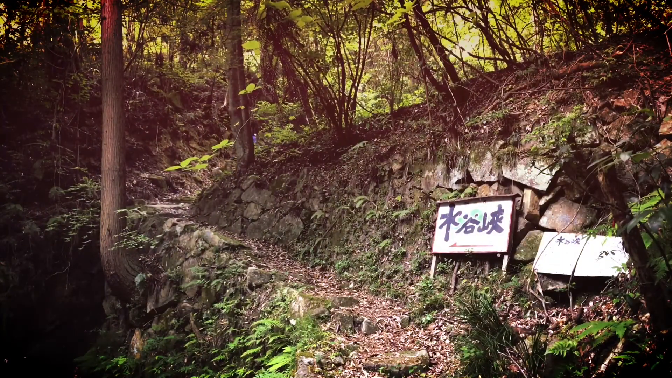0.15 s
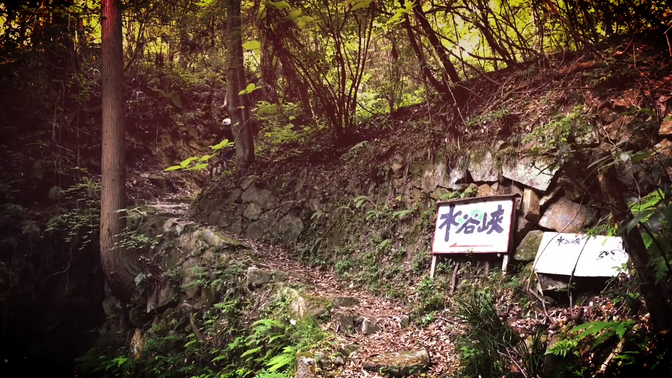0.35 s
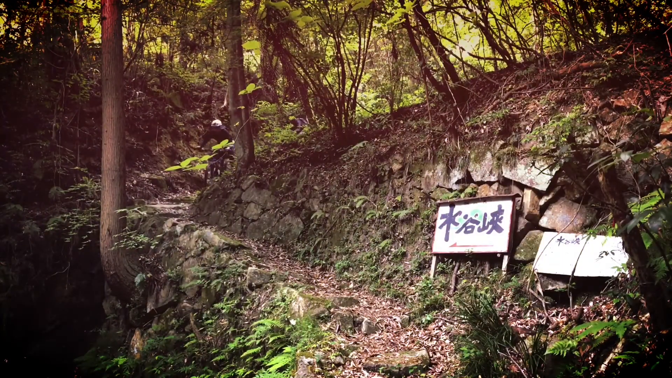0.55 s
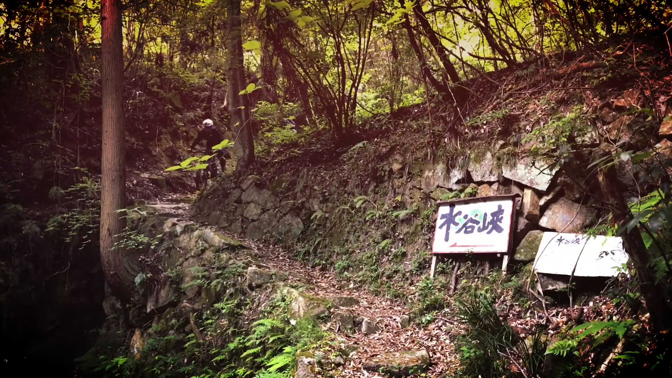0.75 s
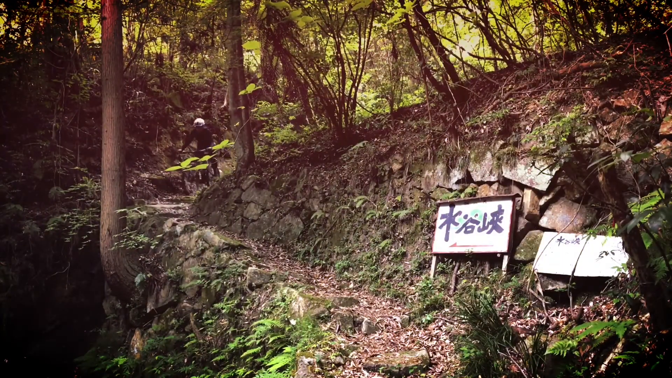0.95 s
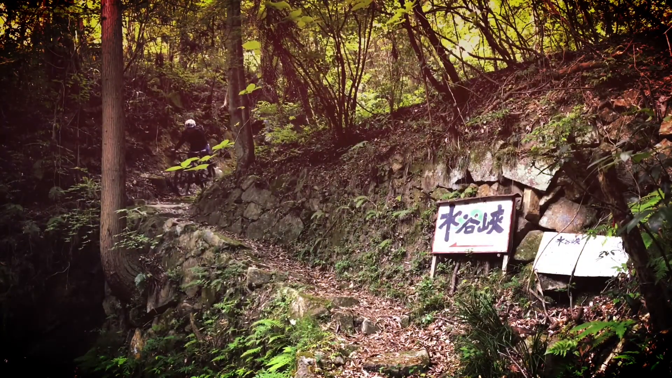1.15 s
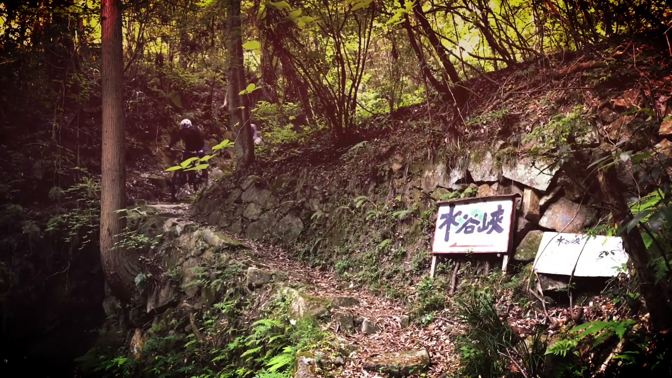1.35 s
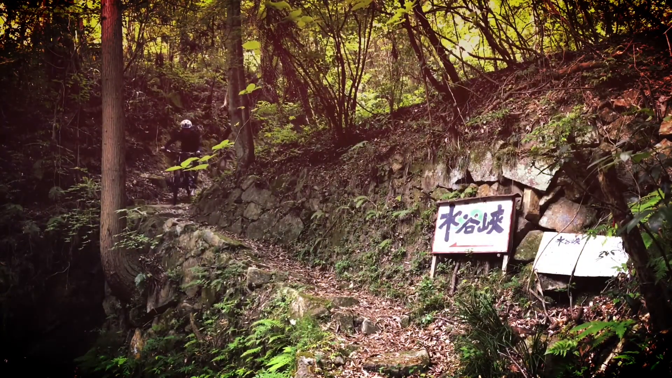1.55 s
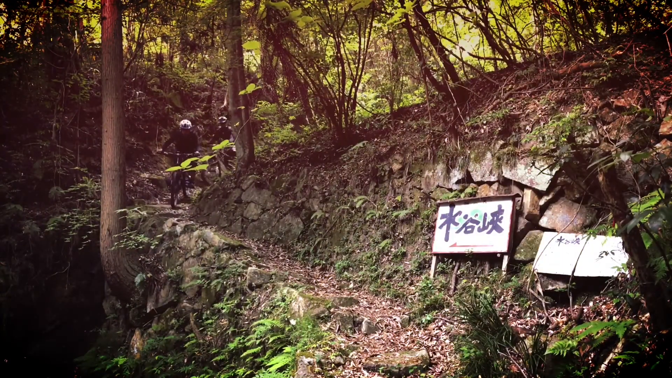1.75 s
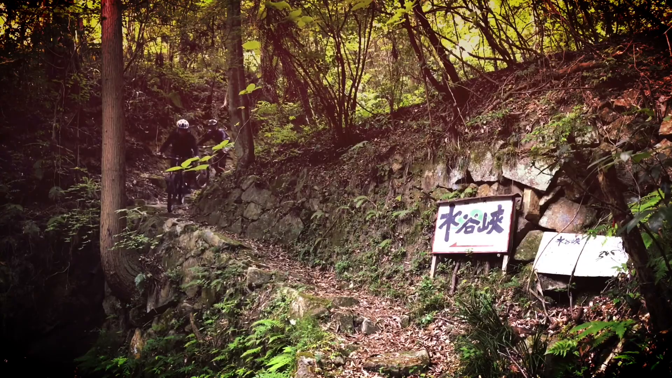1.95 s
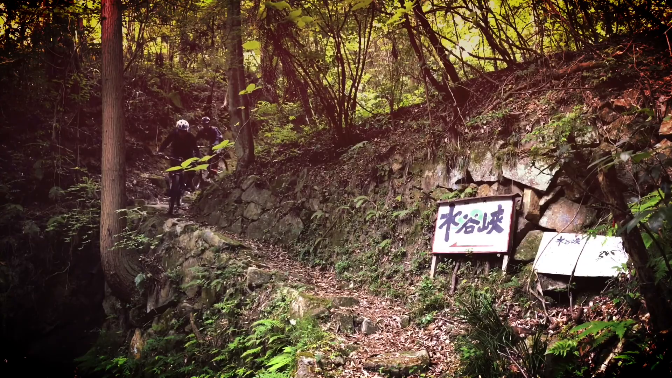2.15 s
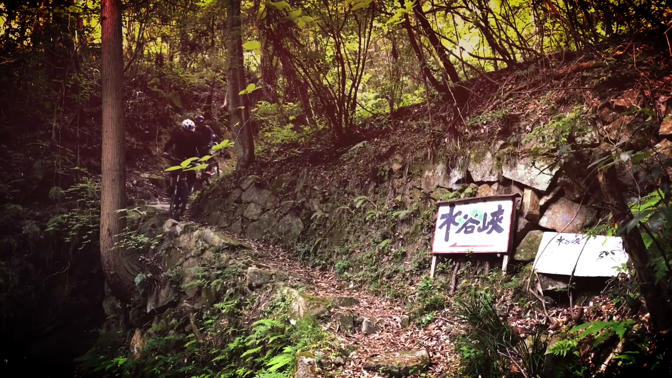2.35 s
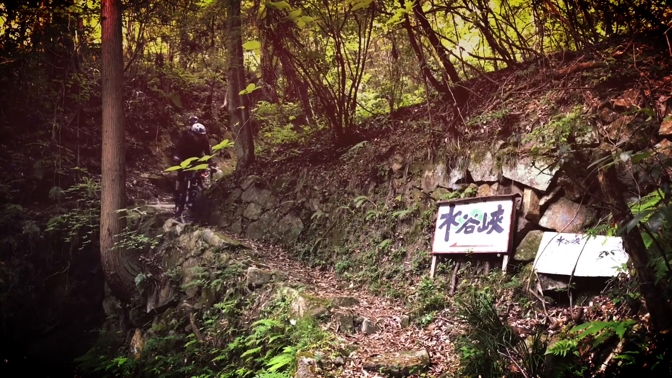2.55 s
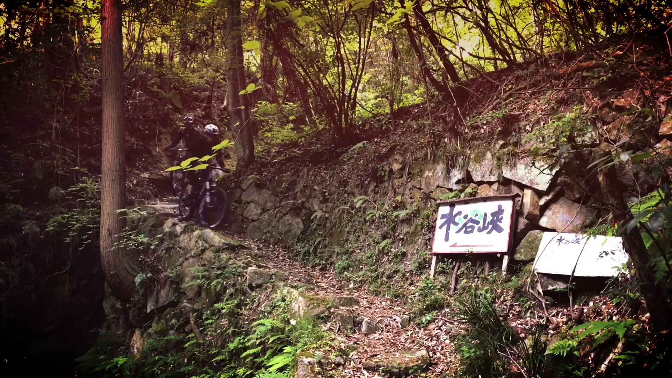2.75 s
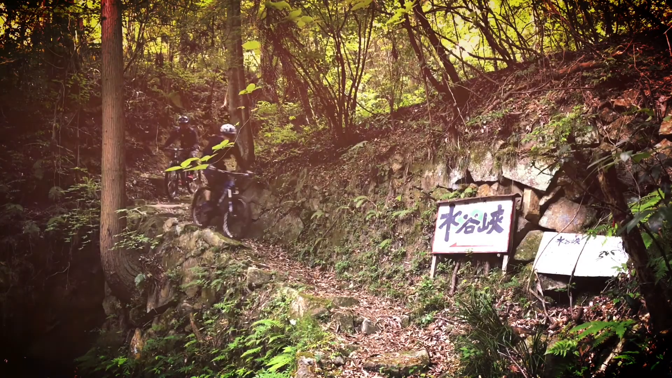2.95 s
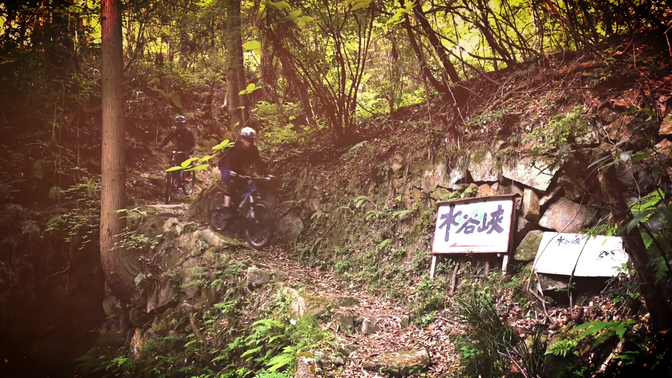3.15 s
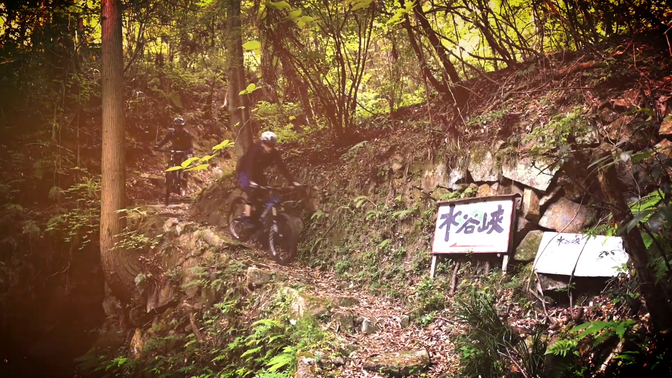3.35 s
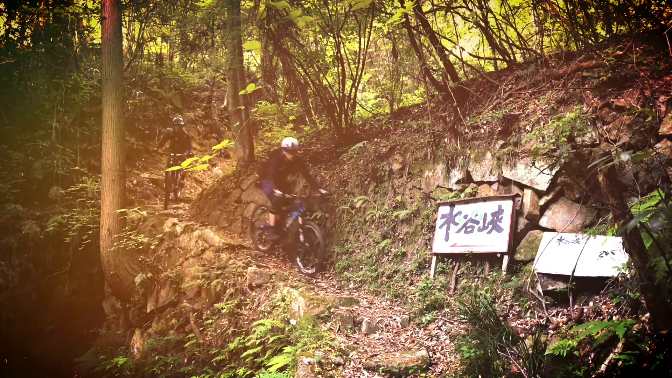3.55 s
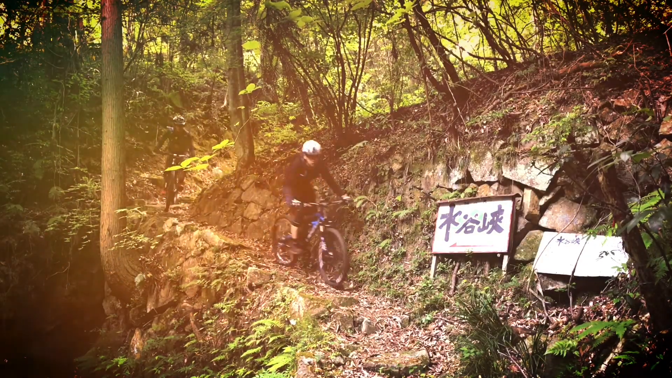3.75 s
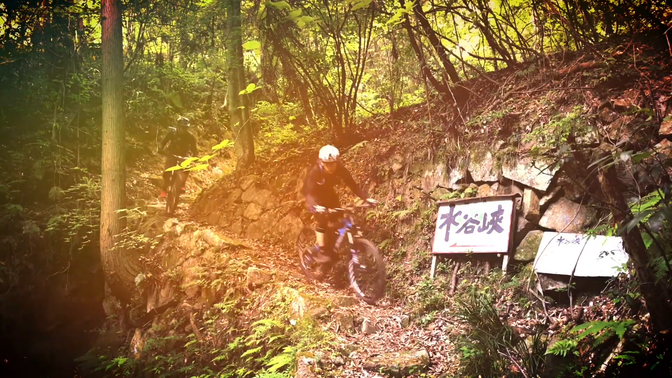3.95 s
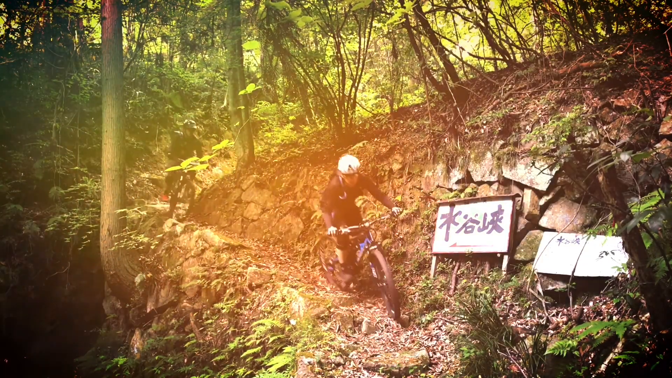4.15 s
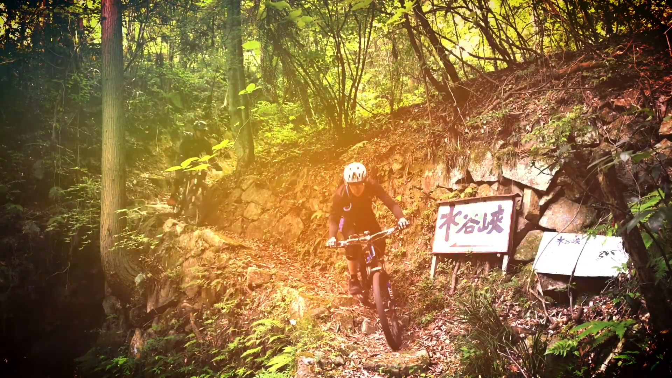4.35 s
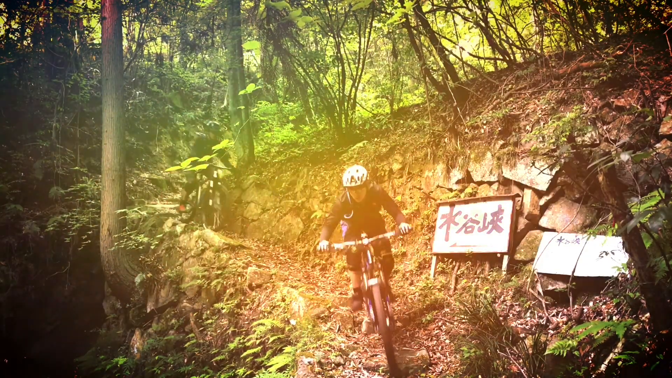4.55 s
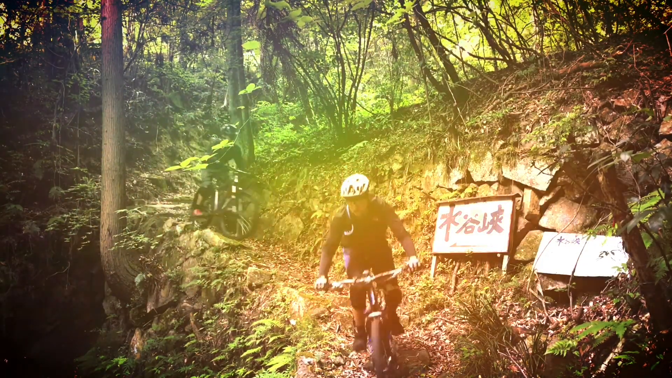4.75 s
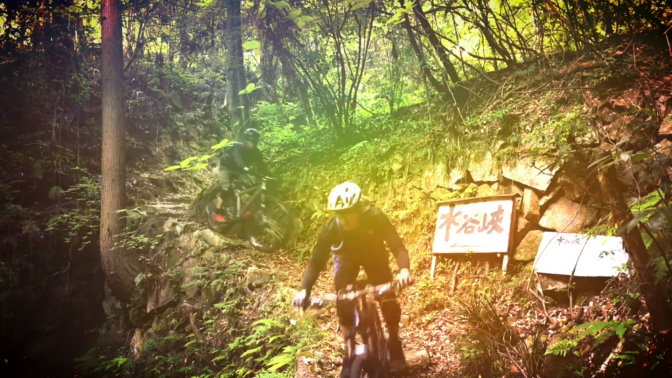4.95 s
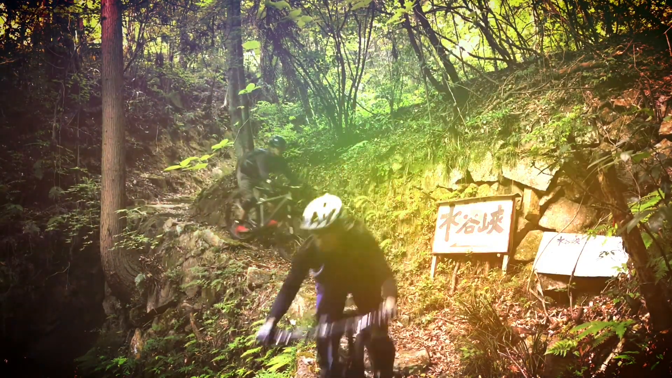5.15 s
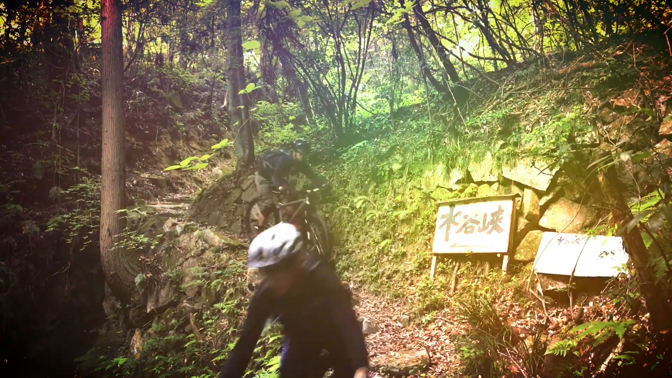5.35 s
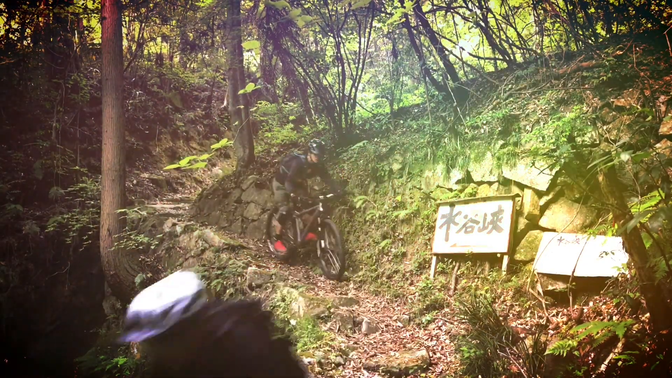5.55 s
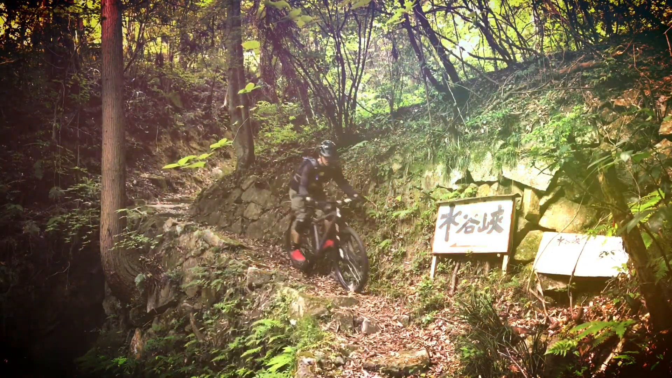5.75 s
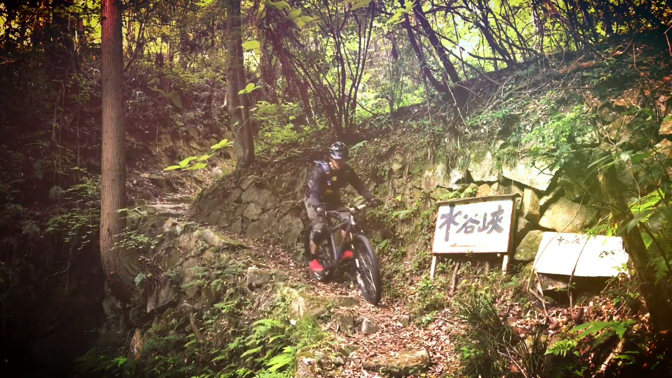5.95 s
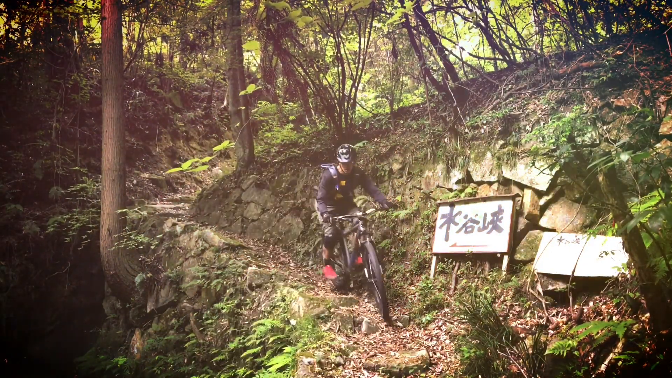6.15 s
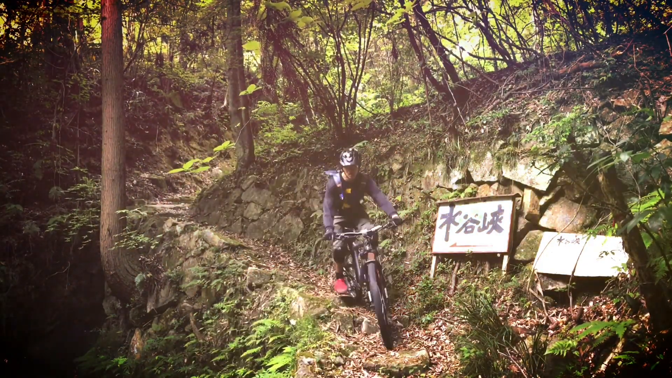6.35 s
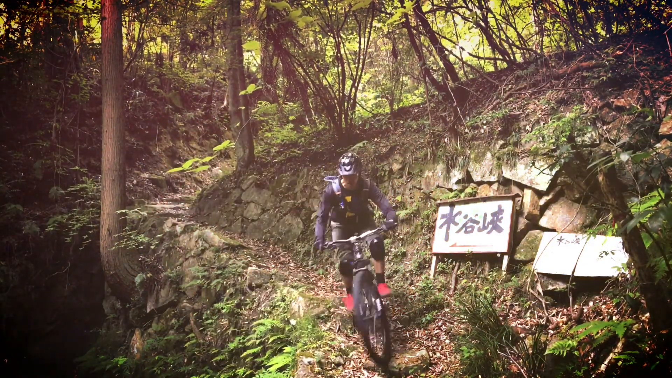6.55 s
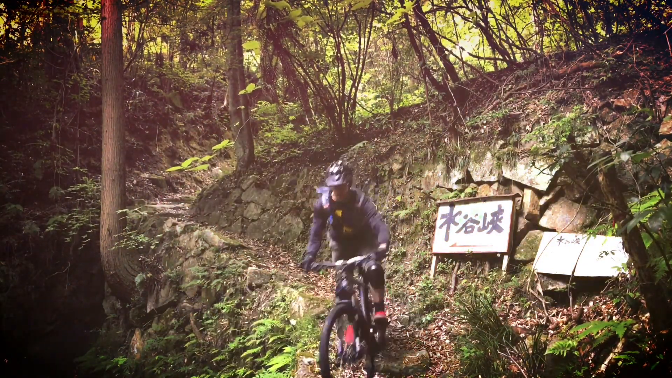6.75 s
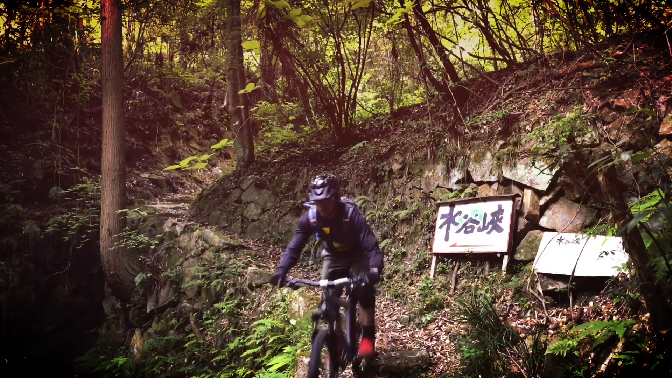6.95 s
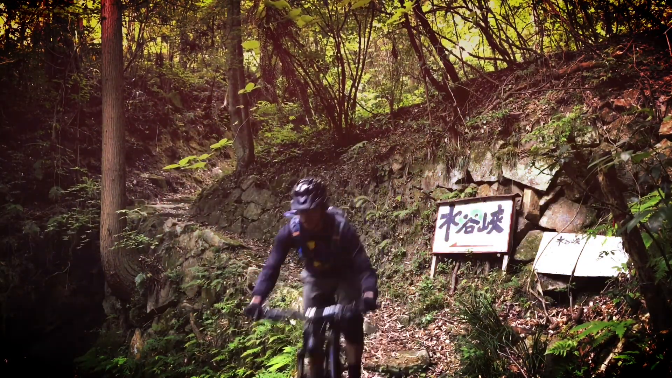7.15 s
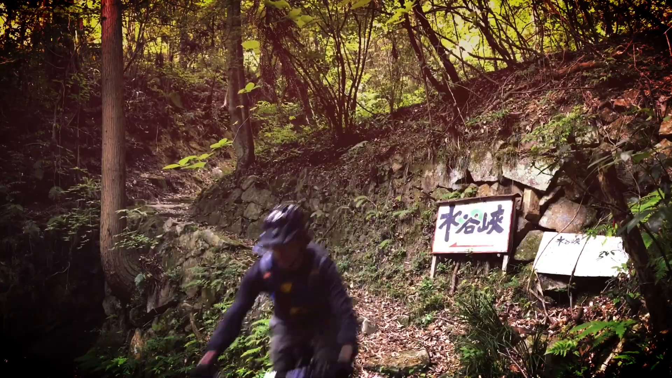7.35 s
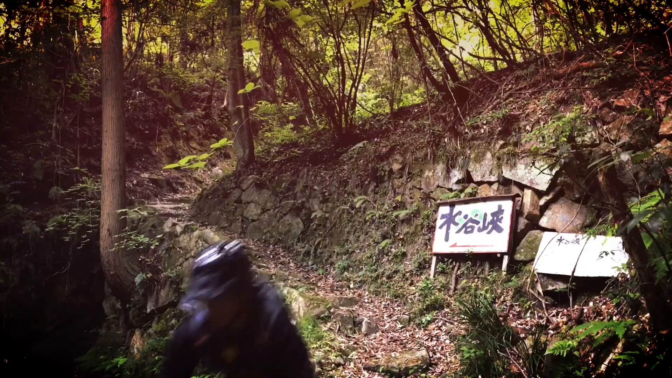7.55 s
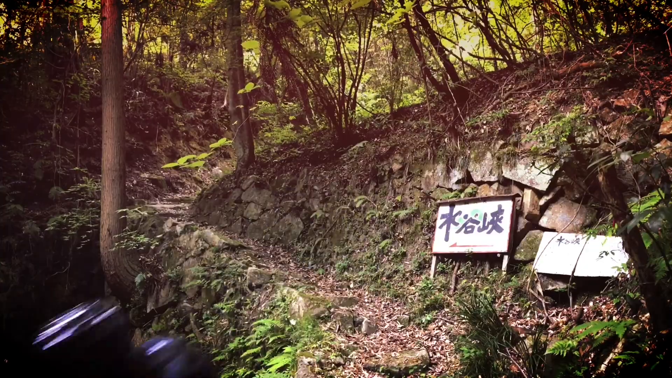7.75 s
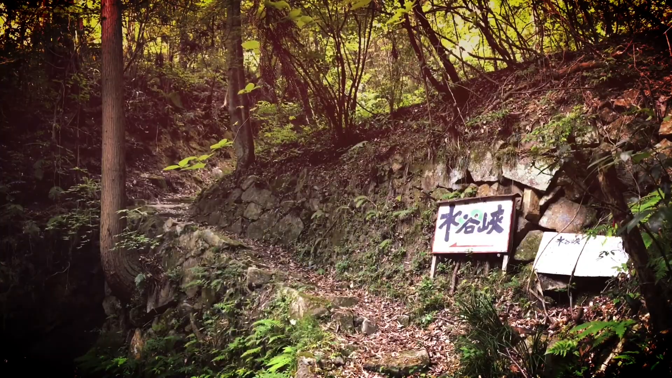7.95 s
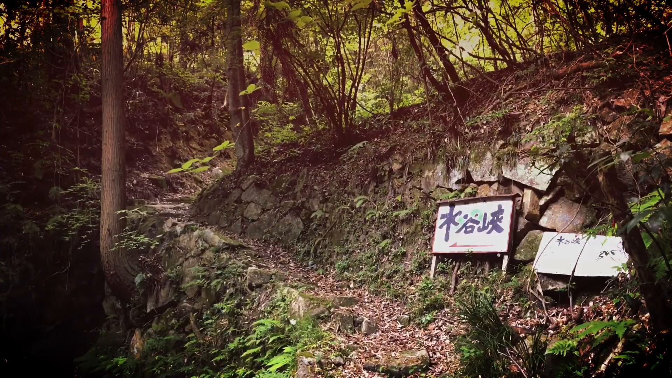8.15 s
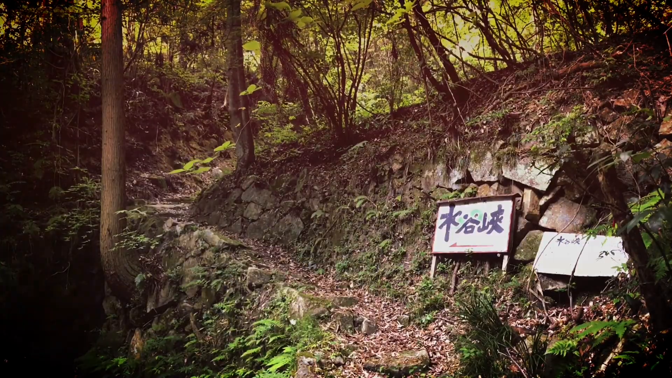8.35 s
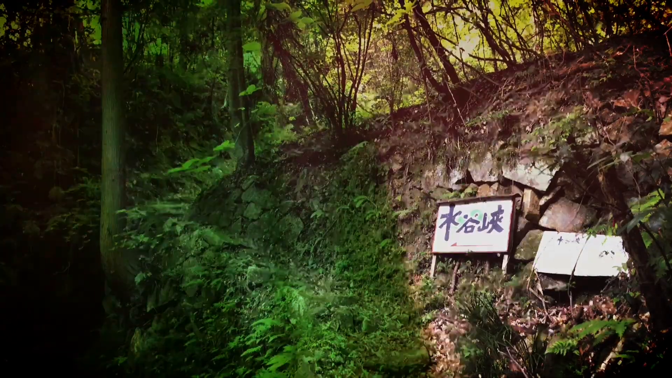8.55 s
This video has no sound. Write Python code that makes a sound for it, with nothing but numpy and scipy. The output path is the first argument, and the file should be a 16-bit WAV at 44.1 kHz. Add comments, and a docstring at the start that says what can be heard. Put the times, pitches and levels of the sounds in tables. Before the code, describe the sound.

A stationary outdoor microphone beside a leafy, stony trail hears two bicycles descend. Sparse pebble knocks and rustling tyres come first, quiet over thin stream hiss. Rubber thumps, tumbling stones and metallic chain rattle crowd together at the loudest close pass, then drop away. A second shorter burst of frame clatter and thumps leads to a sharp, deep landing, some last stone knocks and a softer thud, with slight woodland reverberation.

```python
"""Two mountain bikes come down a rocky forest trail, one after the other, over the faint hiss of a stream.
At first tyres crunch softly and stones knock; past 4 s thumps, scuffs and chain slaps crowd into a loud pass near 6 s.
A smaller flurry follows from 7 s, with a hard landing at 8 s and a softer one as the hiss sinks away.
Leaves, grit and ground are coloured grains; tyres are gliding sines; stones and metal are struck modes.
Frames and chains are clusters of clicks, and the trees scatter a short echo of the bikes."""
import sys
import numpy as np
from scipy import signal
from scipy.fft import rfft, irfft, next_fast_len
from scipy.io import wavfile
from scipy.ndimage import uniform_filter1d

SR = 44100
rng = np.random.default_rng(int(sys.argv[2]) if len(sys.argv) > 2 else 0)


def to_wav(s):
    """Save 16-bit WAV."""
    ch = np.atleast_2d(s).T  # columns
    pcm = np.round(np.clip(ch, -1, 1) * 32767)  # PCM
    wavfile.write(sys.argv[1], SR, pcm.astype(np.int16))


N = 378819
T = np.arange(N) / SR  # s

# a tyre meets a rock or root: start_s, level_db, casing_slap_db (relative to the bounce)
THUMP_HITS = [(0.306, -46.5, 0.5), (1.272, -46.5, 0.5), (1.489, -48, -1), (1.711, -56, 8),
              (1.929, -45.5, 3.5), (2.325, -55, -10), (2.429, -46.5, -2), (2.601, -50.5, 0),
              (2.769, -49, 2), (2.851, -52.5, 7), (2.884, -49, -12), (2.981, -44.5, -19), (3.263, -47, -7),
              (3.721, -49, -3), (4.013, -46, -2), (4.042, -45, 4), (4.345, -49, 7), (4.684, -36, -3),
              (5.002, -35.5, -1.5), (5.212, -34, -16), (5.29, -31, -5), (5.343, -33, 7), (5.511, -29.5, 3),
              (5.647, -29, 3), (5.693, -39.5, 10.5), (5.753, -29, 0), (5.896, -33, 2), (5.96, -29, 8),
              (6.094, -28, 5), (6.737, -39.5, -6), (7.024, -45, 8), (7.244, -48, 5), (7.394, -38, 9),
              (7.529, -31.5, 3.5), (7.694, -42.5, 5), (7.766, -38.5, 1), (7.833, -36.5, 2.5)]
RING_SCATTER_DB = 2  # how unequally each blow excites the modes of stone and metal


def undb(db):
    """Decibels to gain."""
    return 10 ** (np.asarray(db) / 20)


def unit(x):
    """Scale to rms 1."""
    return x / np.sqrt(np.mean(x ** 2))


def fade(t, t60):
    """Exponential decay, 60 dB down after t60 seconds."""
    return np.exp(-np.log(1000) * t / max(t60, 1 / SR))


def add(track, s, sound):
    """Mix a sound into the track at time s."""
    i = max(int(s * SR), 0)
    track[i:i + len(sound)] += sound[:max(N - i, 0)]


def colour(x, points, size=4096):
    """Causal minimum-phase filter through (Hz, dB) points."""
    hz, db = np.transpose(points)
    grid = np.maximum(np.arange(size // 2 + 1) * SR / size, 1)
    level = np.interp(np.log(grid), np.log(hz), db)
    cepstrum = irfft(np.log(undb(level)))
    # fold the cepstrum forward in time, so that nothing sounds ahead of a blow
    cepstrum[1:size // 2] *= 2
    cepstrum[size // 2 + 1:] = 0
    impulse = irfft(np.exp(rfft(cepstrum)))
    return signal.fftconvolve(x, impulse)[:len(x)]


def walk(rate):
    """Smooth random wander with an rms of 1, with rate new values a second."""
    k = int(SR / rate)
    steps = np.repeat(rng.standard_normal(N // k + 1), k)
    return unit(uniform_filter1d(steps, k)[:N])


def grains(count, rate, spread_db):
    """Random tiny impacts over count samples, rate a second, of unequal size and either sign."""
    size = undb(spread_db * np.minimum(rng.exponential(size=count), 2 * np.e))
    hit = rng.random(count) < rate / SR
    return unit(hit * size * rng.choice([-1, 1], count) + 1e-12)


def strength(x, size=176):
    """Scale a blow to a peak near 1, judged over its loudest few milliseconds."""
    return .5 * x / np.sqrt(uniform_filter1d(x ** 2, size).max())


def ring(modes, t, scatter_db):
    """Decaying sine modes (Hz, dB, t60 s); each blow weights them differently."""
    out = 0
    for hz, db, t60 in modes:
        gain = undb(db + scatter_db * rng.standard_normal())
        out = out + gain * fade(t, t60) * np.sin(2 * np.pi * hz * t)
    return out


def bounce(t, hz, t60, stiffening, settle_s, rise_s):
    """A squeezed tyre: stiff and high at first, it sinks to its bounce pitch."""
    phase = 2 * np.pi * hz * (t + stiffening * settle_s * (1 - np.exp(-t / settle_s)))
    swell = (1 - np.exp(-t / rise_s)) ** 2 * fade(t, t60)
    return -np.sin(phase) * swell / swell.max()


def away(start_s=8.18, db_per_s=36.5):
    """Gain of the stream and the steady crush of leaves, which sink in the last moments."""
    return undb(-db_per_s * np.maximum(T - start_s, 0))


def stream(level_db=-58):
    """Distant water: coloured noise that wavers slightly and sinks at the end."""
    # tone of the water: pitch_hz, level_db (per Hz)
    water_tone = [(25, -30), (59, 8), (170, -15.5), (270, -10.5), (500, -17), (900, -8), (1800, -14.5),
                  (4000, -4.5), (6400, -7), (10000, -7), (15500, -10.5)]
    hiss = unit(colour(rng.standard_normal(N), water_tone))
    return hiss * undb(level_db + 0.38 * walk(5.3)) * away()


def forest(x, t60, wet_db):
    """Trunks and the stone bank scatter many small echoes that build within milliseconds and die away."""
    t = T[:SR]
    build = 1 - np.exp(-t / 0.0045)
    echoes = grains(len(t), rate=2000, spread_db=-14.0) * fade(t, t60) * build
    echoes = echoes / np.sqrt(np.sum(echoes ** 2))
    echoes = colour(echoes, [(80, 1.9), (300, -0.013), (1000, 2.0), (15000, 2.1)])
    return x + undb(wet_db) * signal.fftconvolve(x, echoes)[:N]


def crunch(power, spectrum, texture):
    """Give a run of grains its colour and its power over time."""
    return unit(colour(texture, spectrum)) * np.sqrt(power)


def snaps(rate, t60, spread_db):
    """Twigs and pebbles give way at random, each in a tiny burst of noise."""
    sizes = np.abs(grains(N, rate, spread_db))
    envelope = signal.fftconvolve(sizes, fade(T[:SR // 10], t60))[:N]
    return unit(envelope * rng.standard_normal(N))


def flicker(x, rate, depth_db, count=22):
    """Let bands a third of an octave apart swell and fade at random, each on its own."""
    size = next_fast_len(N)
    spectrum, out = rfft(x, size), np.zeros(N)
    hz = np.maximum(np.arange(len(spectrum)) * SR / size, 1)
    # bands count down from the top; the last one takes all the bass below it
    place = np.minimum(3 * np.log2(SR / 2 / hz), count - 1)
    for k in range(count):
        band = irfft(spectrum * np.maximum(1 - np.abs(place - k), 0), size)[:N]
        out += band * undb(depth_db * walk(rate))
    return out


def burst(s, db, length, attack_s, t60):
    """Power over time of a burst that rises, holds and dies away."""
    power, t = np.zeros(N), T[:SR]
    level = undb(db) * np.minimum(t / attack_s, 1) * fade(np.maximum(t - length, 0), t60)
    add(power, s, level ** 2)
    return power


def wheel_work(kick_s=0.0044, kick_t60_s=0.14, kick_grit_db=-11.5, kick_leaves_db=-11):
    """Power in leaves, grit and ground: steady rolling, scuffs, and debris kicked up at every thump."""
    # how loudly the wheels roll: time_s, leaves_db, grit_db, rumble_db
    ride = [(0.0, -65.5, -70, -68), (1.65, -57.5, -65, -66), (2.03, -56, -60, -62), (2.44, -63, -65, -66),
            (3.54, -54.5, -61.5, -62.5), (3.85, -55.5, -65, -57.5), (4.21, -47.5, -55.5, -54),
            (4.47, -53.5, -56.5, -55.5), (5.0, -58.5, -62.5, -57.5), (5.24, -47, -49.5, -48.5),
            (5.5, -44, -54, -45), (5.93, -44, -49, -40.5), (6.1, -40.5, -44.5, -40),
            (6.27, -50.5, -50.5, -48), (7.01, -50, -52, -58), (8.06, -51.5, -53.5, -46.5),
            (8.33, -52.5, -54, -63), (8.59, -52.5, -66.5, -58)]
    # short scuffs and rustles of a tyre in grit or leaves: start_s, length_s, grit_db, leaves_db
    scuffs = [(0.28, 0.1, -59.5, -59), (0.59, 0.11, -74, -60.5), (0.98, 0.054, -57.5, -57.5),
              (1.535, 0.048, -56, -68), (1.963, 0.023, -54, -54), (2.034, 0.032, -52, -73),
              (2.107, 0.087, -53, -53.5), (2.567, 0.13, -79, -57), (2.962, 0.1, -73, -50.5),
              (3.206, 0.059, -57.5, -51.5), (3.578, 0.039, -48, -47.5), (3.614, 0.14, -47.5, -49),
              (3.748, 0.076, -53, -50.5), (3.96, 0.022, -49, -50), (3.984, 0.086, -48, -45),
              (4.08, 0.14, -50, -63), (4.696, 0.077, -46, -46.5), (4.951, 0.093, -50, -48),
              (5.083, 0.036, -42, -49.5), (5.177, 0.027, -43, -47), (5.362, 0.076, -44, -48.5),
              (5.677, 0.019, -41, -36), (5.762, 0.096, -45, -41), (6.075, 0.13, -46, -47.5),
              (6.282, 0.027, -53, -41.5), (6.807, 0.043, -52, -44.5), (7.017, 0.024, -45, -40),
              (7.209, 0.025, -55, -45.5), (8.032, 0.023, -44, -44), (8.261, 0.03, -53, -52)]
    scuff_swell, scuff_fade = 0.23, 3.2  # rise time and t60, as multiples of the scuff's length
    times, *levels = np.transpose(ride)
    leaves, grit, rumble = (undb(np.interp(T, times, db)) ** 2 for db in levels)
    # kick levels are relative to the thump
    kicks = sum(burst(s, db, kick_s, kick_s, kick_t60_s) for s, db, *_ in THUMP_HITS)
    leaves = leaves * away() ** 2 + kicks * undb(kick_leaves_db) ** 2
    grit = grit + kicks * undb(kick_grit_db) ** 2
    for s, length, grit_db, leaves_db in scuffs:
        scuff = burst(s, 0, length, scuff_swell * length, scuff_fade * length)
        grit = grit + scuff * undb(grit_db) ** 2
        leaves = leaves + scuff * undb(leaves_db) ** 2
    return leaves, grit, rumble


def rolling():
    """Tyres crush leaves, grind fine grit, and rumble over the ground: three coloured runs of grains."""
    # tone of each surface: pitch_hz, level_db (per Hz)
    leaf_tone = [(700, -3), (1800, -7), (3200, 3.5), (4400, 3), (6300, -1), (8500, -1), (12000, 1.5),
                 (16000, -7)]
    grit_tone = [(250, -10.5), (480, -5), (720, 2), (1050, 0.5), (1500, -2.5), (2400, -4.5), (3500, -11.5),
                 (7000, -36.5)]
    ground_tone = [(25, -6.5), (45, 6.5), (70, 6), (120, -1.5), (170, -7), (235, 4), (330, -6), (450, -7),
                   (800, -22.5), (2000, -37.5)]
    bumps = walk(45)  # the load on the tyres shakes all three together
    leaves = grains(N, rate=14000, spread_db=3.0) + undb(-5.5) * snaps(rate=87, t60=0.02, spread_db=2.5)
    leaves = flicker(leaves, rate=30, depth_db=2.5)
    grit = grains(N, rate=4500, spread_db=1.0) + undb(-6.0) * snaps(rate=220, t60=0.0076, spread_db=2.0)
    grit = flicker(grit, rate=40, depth_db=2.5)
    earth = flicker(grains(N, rate=700, spread_db=1.0), rate=20, depth_db=2.5)
    in_leaves, in_grit, in_ground = wheel_work()
    return (crunch(in_leaves, leaf_tone, leaves * undb(1.12 * bumps))
            + crunch(in_grit, grit_tone, grit * undb(1.25 * bumps))
            + crunch(in_ground, ground_tone, earth * undb(1.4 * bumps)))


def tumbles(spread_db=2.5, count=64):
    """Loose stones clack together in quick succession, each with its own pitch and strength."""
    # stones tumble behind a wheel: start_s, length_s, level_db (rms over the length), middle_pitch_hz
    runs = [(3.648, 0.082, -47.5, 1260), (4.092, 0.12, -50.5, 1240), (5.374, 0.062, -40.5, 1200),
            (5.785, .06, -40.5, 723), (5.983, 0.056, -43.5, 754), (6.104, 0.067, -44, 690)]
    knocks_per_s, pitch_octaves, ring_cycles = 340, 0.485, 21  # pitch spread; t60 in cycles of the pitch
    out, t = np.zeros(N), T[:SR // 12]
    for s, length, db, middle_hz in runs:
        run = np.zeros(N)
        knocks = np.column_stack([rng.random(count), rng.standard_normal((count, 2))])
        for when, pitch, size in knocks[:max(int(knocks_per_s * length), 1)]:
            hz = middle_hz * 2 ** (pitch_octaves * pitch)
            knock = np.sin(2 * np.pi * hz * t) * fade(t, ring_cycles / hz)
            add(run, s + when * length, undb(spread_db * size) * knock)
        out += undb(db) * run * np.sqrt(length * SR / np.sum(run ** 2))
    return out


def stones(grind_db=-14, tone_db=-3, ring_s=0.049, rubbed_db=-1, rise_s=0.0012):
    """A knocked stone rings with a close pair of modes and grinds to rest; small ones sound brighter."""
    # stones knocked under the wheels: start_s, level_db, pitch_hz, grinding_t60_s
    hits = [(0.31, -48.5, 1480, 0.082), (.795, -52, 950, 0.049), (.961, -39.5, 855, 0.099),
            (1.484, -55, 850, 0.056), (1.708, -49.5, 743, .06), (1.97, -44, 440, 0.075),
            (2.121, -46, 470, 0.1), (2.166, -42.5, 690, 0.051), (2.985, -42, 850, 0.019),
            (3.009, -33.5, 3790, 0.018), (3.066, -40.5, 1050, 0.033), (3.195, -46, 4200, .02),
            (3.25, -40.5, 944, 0.047), (3.541, -43.5, 820, 0.058), (3.595, -39, 980, 0.17),
            (3.768, -40, 1020, 0.031), (4.015, -44, 649, .04), (4.069, -36.5, 2510, 0.036),
            (4.67, -39, 790, .06), (5.538, -31.5, 610, 0.13), (5.595, -34.5, 820, 0.18),
            (5.695, -37, 890, 0.055), (5.778, -23.5, 670, 0.099), (5.895, -31.5, 410, 0.041),
            (5.99, -33, 781, 0.089), (6.107, -29.5, 800, 0.036), (6.128, -29.5, 2440, 0.065),
            (6.223, -37.5, 633, .04), (6.452, -40, 1050, .1), (7.031, -38, 610, 0.054),
            (7.74, -36.5, 745, 0.035), (8.316, -41.5, 1110, 0.032), (8.454, -44, 910, 0.045)]
    # tone of the scrape of a stone pitched at tone_hz: pitch_hz, level_db (per Hz)
    scrape_tone = [(120, -10.5), (350, -10.5), (800, 6), (1600, 0), (3200, -10), (8000, -28)]
    tone_hz, pair_ratio = 800, 1.12  # other pitches shift the tone; ratio of the two modes
    out, t = np.zeros(N), T[:SR // 4]
    for s, db, hz, t60 in hits:
        decay = fade(t, t60) + undb(grind_db) * fade(t, 2 * t60)
        contact = grains(len(t), rate=6000, spread_db=3.0) * (1 - np.exp(-t / rise_s)) * decay
        modes = ring([(hz, 0, ring_s), (pair_ratio * hz, -3, ring_s)], t, RING_SCATTER_DB)
        rubbed = signal.fftconvolve(contact, modes)[:len(t)]
        tone = strength(strength(modes) + undb(rubbed_db) * strength(rubbed))
        scrape = strength(colour(contact, [(f * hz / tone_hz, level) for f, level in scrape_tone]))
        add(out, s, undb(db) * (scrape + undb(tone_db) * tone))
    return out


def frame(rise_s=0.0021):
    """A jolt makes fork, frame and loose parts strike in a quick cluster: a dry, dense clack."""
    # fork and frame are jolted: start_s, level_db, pitch_ratio, t60_s
    jolts = [(5.963, -34, 0.56, .04), (6.505, -31.5, 1, 0.073), (6.586, -29, 1.08, .06),
             (7.097, -34, 1.4, 0.063), (7.139, -36, 1.8, 0.068), (7.392, -37, 1.14, .06),
             (7.526, -28.5, 1.5, .04), (7.595, -30.5, 1.8, 0.037), (7.695, -29, 1.5, 0.038),
             (7.767, -34, 0.97, .05), (7.833, -28.5, 0.96, 0.041), (8.06, -26, 0.93, 0.03)]
    # tone of the clack at ratio 1: pitch_hz, level_db (per Hz)
    clack_tone = [(150, -4.5), (450, -4), (900, -0.5), (1500, -2), (2400, -6), (4000, -16.5), (9000, -28)]
    out, t = np.zeros(N), T[:SR // 6]
    for s, db, ratio, t60 in jolts:
        strikes = grains(len(t), rate=5000, spread_db=2.5) * (1 - np.exp(-t / rise_s)) * fade(t, t60)
        clack = colour(strikes, [(hz * ratio, level) for hz, level in clack_tone])
        add(out, s, undb(db) * strength(clack))
    return out


def chain(rise_share=0.11, metal_db=-12, metal_t60=0.045, detune=.012):
    """Links land in a quick cluster of clicks, and metal parts ring briefly, a little differently each time."""
    # chain and cables slap the frame: start_s, level_db, clatter_t60_s, top_treble_db
    slaps = [(1.942, -40, 0.0096, -18), (2.4444, -42.5, 0.059, -10), (3.0086, -31, 0.011, -2),
             (3.5334, -36, 0.034, -3), (4.014, -30.5, 0.02, -26), (4.668, -37, 0.033, -13),
             (5.08, -35.5, 0.041, -12), (5.205, -26.5, 0.017, -10), (5.287, -32, 0.033, -7),
             (5.3255, -28.5, 0.016, -7), (5.536, -20, 0.024, -13.5), (5.592, -29, 0.092, -1),
             (5.6512, -31.5, 0.034, -22), (5.759, -24, 0.045, -4), (5.7752, -18, 0.014, -2.5),
             (5.826, -19.5, 0.018, -7), (5.8963, -29, 0.02, -7), (5.9653, -24, 0.013, -10),
             (5.989, -25, 0.035, -12), (6.043, -29.5, 0.012, -4), (6.0582, -17, 0.022, 2),
             (6.084, -23.5, 0.051, -2), (6.2565, -28.5, 0.027, -14), (6.503, -34, 0.044, -9),
             (7.023, -35, 0.11, -20), (7.327, -34.5, 0.078, -8), (7.521, -28, 0.033, -7),
             (7.753, -29, 0.082, -6), (7.8358, -33, 0.036, 2), (8.0595, -37, 0.02, -7)]
    # modes of chain, sprockets and brake discs: pitch_hz, level_db
    metal_modes = [(2217, -1.5), (3720, 2), (4561, 7), (5355, 7.5), (6186, 5.5), (6747, 9.5), (8828, 6),
                   (9479, 8.5), (11854, 12), (12561, 15)]
    # tone of the clicks: pitch_hz, level_db (per Hz)
    click_tone = [(300, -4), (900, -5), (2000, 0), (3800, 6), (6300, 5.5), (9000, 8), (16000, 8.5)]
    out, t = np.zeros(N), T[:SR // 4]
    for s, db, length, bright_db in slaps:
        swell = (1 - np.exp(-t / (rise_share * length))) ** 2
        links = grains(len(t), rate=7400, spread_db=2.0) * swell * fade(t, length)
        modes = [(hz * (1 + detune * rng.standard_normal()), level, metal_t60) for hz, level in metal_modes]
        metal = signal.fftconvolve(links, ring(modes, t, RING_SCATTER_DB))[:len(t)]
        slap = strength(colour(links, click_tone)) + undb(metal_db) * strength(metal)
        add(out, s, undb(db) * strength(colour(slap, [(3500, 0), (11000, bright_db)])))
    return out


def landings(rattle_db=-17):
    """A wheel drops off a step: a deep bounce, a dull crack and singing spokes."""
    # heavy landings: start_s, level_db, bounce_hz, bounce_t60_s, crack_db, spoke_ring_db
    drops = [(6.305, -34.5, 103.5, 0.2, -4, -42), (8.062, -19, 82.5, 0.032, 1, -20.5),
             (8.515, -27.5, 114, 0.18, 3, -46)]
    # modes of the ringing wheel: pitch_hz, level_db, t60_s
    wheel_modes = [(160.3, -3.5, 0.93), (204, -10, 0.25), (291, -15, 0.3), (330, -13, 0.53),
                   (485, -7.5, 0.64), (625, -16, 0.45)]
    # tone of the crack: pitch_hz, level_db (per Hz)
    crack_tone = [(60, -37), (200, 8.5), (340, 9.5), (600, -9.5), (1100, -6.5), (1900, -19), (2400, -59),
                  (8000, -52)]
    out, t = np.zeros(N), T[:SR]
    for s, db, hz, t60, crack_db, ring_db in drops:
        body = bounce(t, hz, t60, stiffening=4.7, settle_s=0.0018, rise_s=0.0019)
        # one firm push, and loose parts that settle
        rattle = rng.standard_normal(len(t)) * fade(t, t60 / 2)
        blow = undb(rattle_db) * rattle - (t == 0)
        crack = strength(colour(blow, crack_tone))
        spokes = ring(wheel_modes, t, RING_SCATTER_DB)
        add(out, s, undb(db) * (body + undb(crack_db) * crack + undb(ring_db) * spokes))
    return out


def thumps(air_db=-21, ground_db=-10):
    """Each rock bounces the tyre, shakes the ground, slaps the casing and rings the air inside it."""
    # bounce pitch at 0 dB; a softer hit squeezes the tyre less and sounds lower
    bounce_hz, bounce_hz_per_db = 88, 0.8
    casing_tone = [(70, 0.0), (170, -1.5), (320, -1.0), (500, -13.5), (1200, -12.5), (4000, -95)]  # Hz, dB
    out, t = np.zeros(N), T[:SR // 3]
    ground = bounce(t, 43, t60=.09, stiffening=2.5, settle_s=.007, rise_s=.012)
    for s, db, slap_db in THUMP_HITS:
        hz = bounce_hz + bounce_hz_per_db * db
        body = bounce(t, hz, t60=0.093, stiffening=3.47, settle_s=0.0039, rise_s=0.014)
        slap = strength(colour(rng.standard_normal(len(t)) * fade(t, 0.097), casing_tone))
        air_hz = 245 * (1 + .1 * rng.standard_normal())
        air = np.sin(2 * np.pi * air_hz * t) * fade(t, .16)
        casing = undb(slap_db) * (slap + undb(air_db) * air)
        add(out, s, undb(db) * (body + undb(ground_db) * ground + casing))
    return out


def scene():
    """Both bikes among the trees, and the stream."""
    bikes = rolling() + tumbles() + stones() + frame() + chain() + landings() + thumps()
    among_trees = forest(bikes, t60=.35, wet_db=-16)
    return (among_trees + stream())[None]


def record(dry):
    """The microphone ripples the treble and loses the deepest bass; the top is cut."""
    # response of the microphone: pitch_hz, gain_db
    response = [(30, 0.5), (4500, 0.5), (5000, 0.5), (6300, 4.5), (7700, 1.5), (9600, 3), (10300, -1.5),
                (11900, 1.5), (13500, 2)]
    low_cut = signal.butter(2, 30, "high", fs=SR, output="sos")
    top_cut = signal.ellip(10, .2, 70, 15850, fs=SR, output="sos")
    x = signal.sosfilt(low_cut, colour(dry[0], response))
    return signal.sosfilt(top_cut, x)[None]


dry = scene()
out = record(dry)
to_wav(out)
```